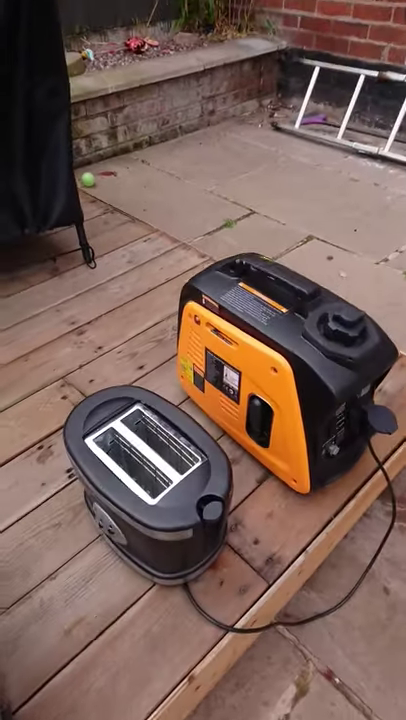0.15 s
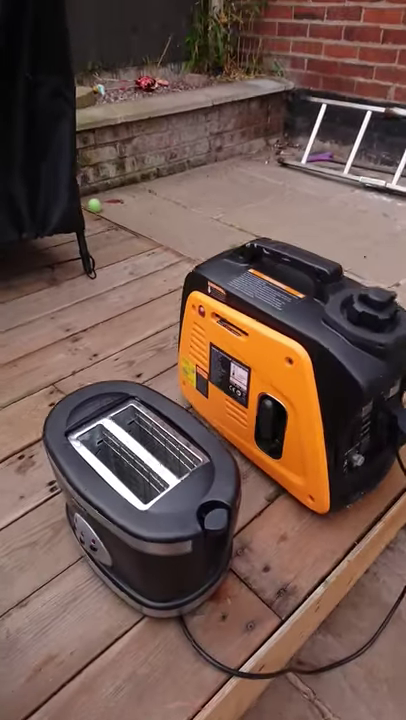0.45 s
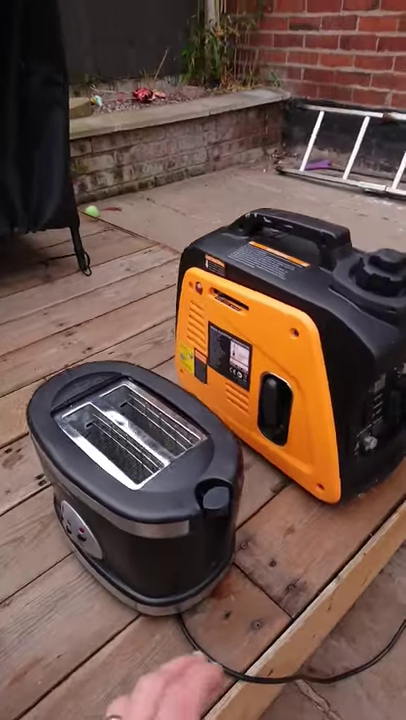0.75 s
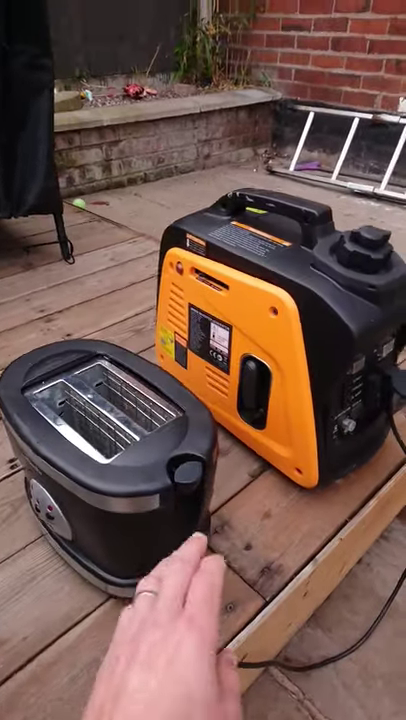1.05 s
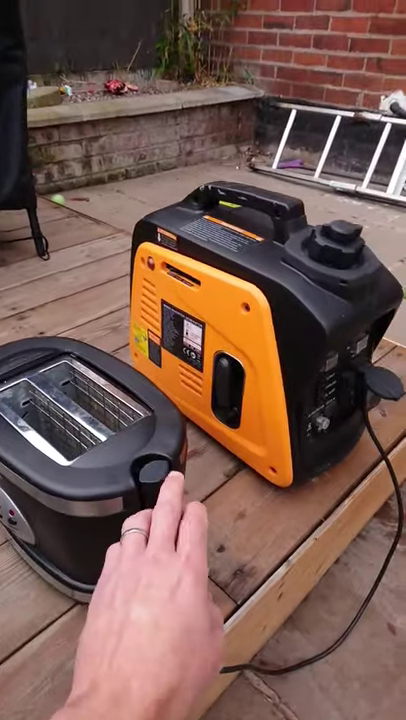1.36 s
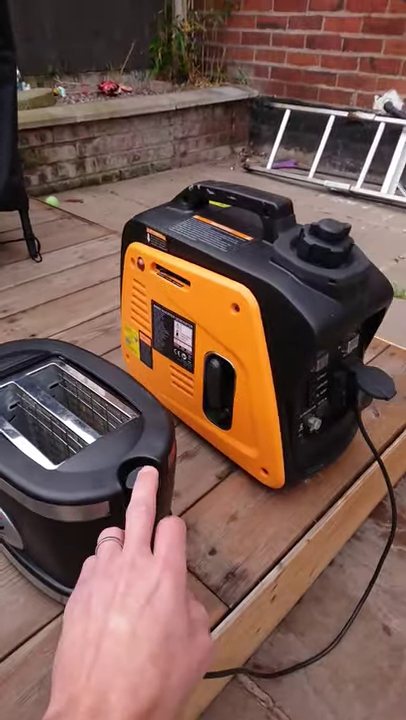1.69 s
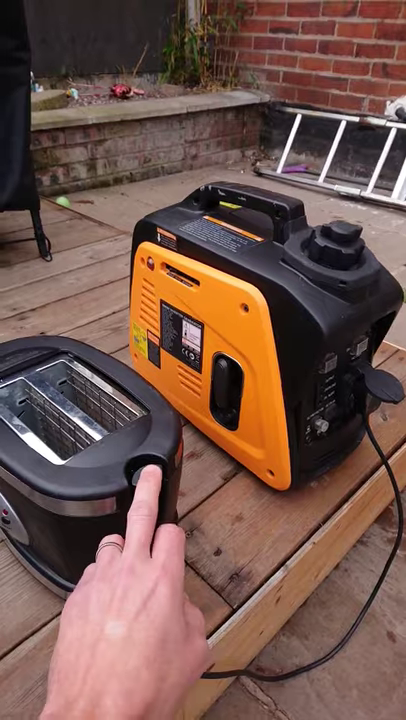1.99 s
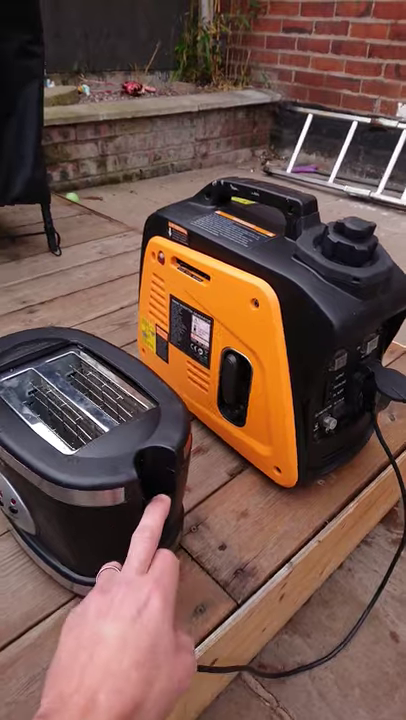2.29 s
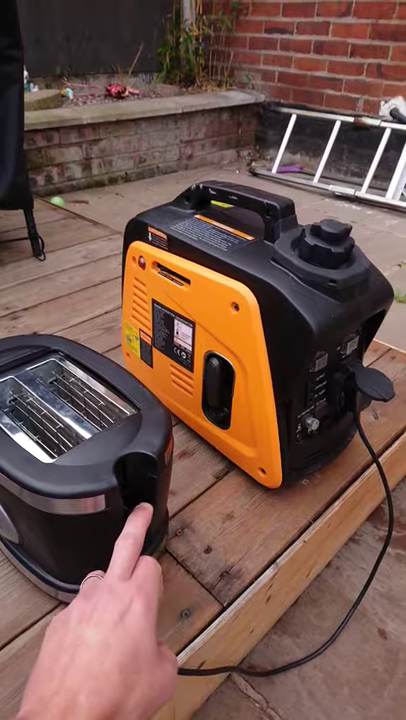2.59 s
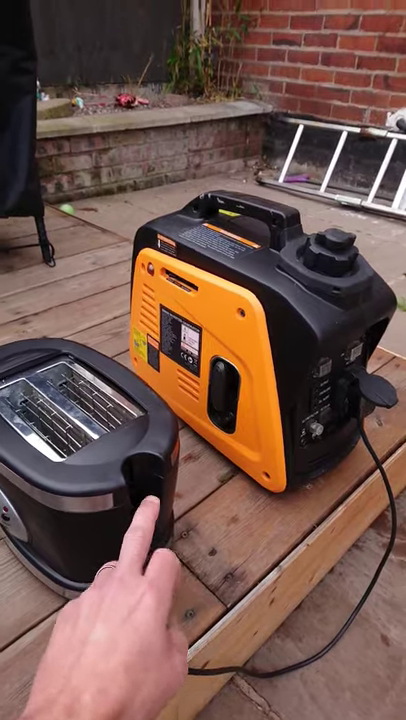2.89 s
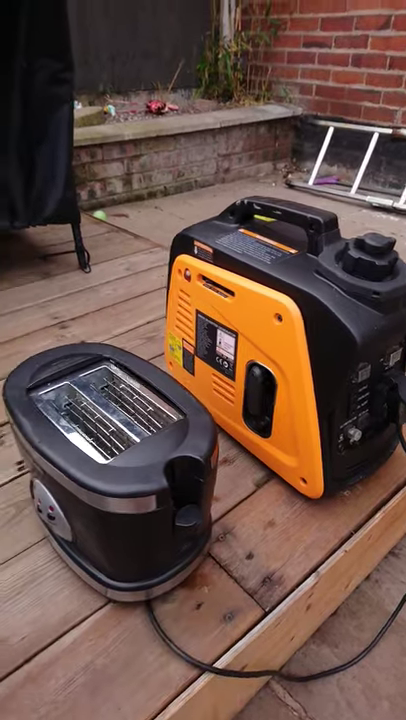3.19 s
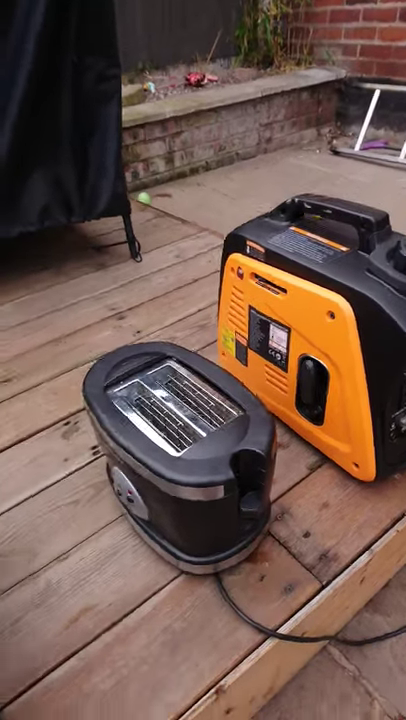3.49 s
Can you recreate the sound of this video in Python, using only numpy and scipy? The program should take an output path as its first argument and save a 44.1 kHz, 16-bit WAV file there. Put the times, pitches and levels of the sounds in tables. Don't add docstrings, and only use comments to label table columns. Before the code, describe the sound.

A small petrol generator drones outdoors, then sags under load and revs up louder.

```python
import sys
import numpy as np
from scipy import signal
from scipy.fft import rfft, irfft, next_fast_len
from scipy.io import wavfile
from scipy.ndimage import uniform_filter1d

SR = 44100
rng = np.random.default_rng(int(sys.argv[2]) if len(sys.argv) > 2 else 0)


def undo_db(level):
    steps = np.asarray(level, float) / 20
    return 10 ** steps


def pcm_store(signal):
    levels = np.round(np.clip(np.atleast_2d(signal), -1, 1) * 32767)
    wavfile.write(sys.argv[1], SR, levels.astype(np.int16).T)


N = 160965


def read(table, hz):
    table = np.array(table, float)
    return np.interp(np.log(np.maximum(hz, 1)), np.log(table[:, 0]), table[:, 1])


def unit(x):
    return x / np.sqrt(np.mean(x ** 2))


def walk(rate_hz):
    hold = int(SR / rate_hz)
    steps = np.repeat(rng.standard_normal(N // hold + 1), hold)
    return unit(uniform_filter1d(uniform_filter1d(steps, hold), hold)[:N])


# (multiple of the firing rate, level [dB])
FAR_IDLE = [(1, -35), (2, 0), (3, -3), (4, -8.5), (5, -2), (6, -2), (7, -6.5), (8, -30), (9, -7),
            (10, -9.5), (11, -18), (12, -23), (13, -18), (14, -35), (15, -30), (16, -27), (17, -21),
            (18, -23), (19, -26), (20, -34), (21, -32), (22, -29), (23, -27), (24, -36)]
IDLE = [(1, -42), (2, 0.5), (3, -4), (4, -8.5), (5, -4), (6, -4.5), (7, -7), (8, -17), (9, -4), (10, -10),
        (11, -17), (12, -19.5), (13, -18), (14, -35), (15, -26.5), (16, -31), (17, -24.5), (18, -30),
        (19, -28.5), (20, -31.5), (21, -29.5), (22, -21), (23, -37.5), (24, -16.5)]
LUGGING = [(1, -42), (2, 0), (3, -3), (4, -5.5), (5, -7), (6, -3), (7, -17), (8, -13), (9, -2.5), (10, -21),
           (11, -16), (12, -28), (13, -17.5), (14, -27), (15, -29), (16, -28), (17, -11.5), (18, -28),
           (19, -22), (20, -22), (21, -35), (22, -21), (23, -31), (24, -25)]
CATCHING = [(1, -33), (2, 0), (3, -5), (4, -3.5), (5, -13), (6, -2.5), (7, -21), (8, -12), (9, -7.5),
            (10, -16), (11, -23), (12, -14), (13, -15), (14, -29), (15, -23), (16, -23), (17, -10.5),
            (18, -30), (19, -17.5), (20, -20), (21, -37), (22, -20), (23, -24), (24, -23)]
PULLING = [(1, -34), (2, 1), (3, -5.5), (4, -7), (5, -25), (6, -6), (7, -22), (8, -12.5), (9, -5.5),
           (10, -10.5), (11, -18.5), (12, -20), (13, -16.5), (14, -15), (15, -40), (16, -19), (17, -11),
           (18, -24), (19, -24), (20, -17), (21, -18), (22, -30), (23, -18), (24, -34)]
REVVED = [(1, -27), (2, 0.5), (3, -6), (4, -9), (5, -24), (6, -3), (7, -9), (8, -13.5), (9, -9.5),
          (10, -12), (11, -22.5), (12, -16.5), (13, -24.5), (14, -26), (15, -15), (16, -16), (17, -17.5),
          (18, -16.5), (19, -25), (20, -18.5), (21, -31), (22, -34), (23, -35), (24, -25)]
LUG_HZ, CATCH_HZ, PULL_HZ, REV_HZ = 33.4, 34.44, 35.67, 37.88
IDLE_PULSE, PULL_PULSE, REV_PULSE = (.365, .005, -.07), (.353, -.016, -.1), (.78, .023, .11)
PULSE_ORDER = 4
SILENCER_ORDER, TRAIL_TURNS = 12, .04
WOBBLE_DB, WOBBLE_PER_ORDER_DB, DRIFT_PER_ORDER_RAD = 0.64, .03, .011
LOAD_STEADIES = .7


def exhaust(turn, hz, load, far):
    orders = np.arange(1, len(IDLE) + 1)
    states = []
    for table, (at, ahead, lead) in ((FAR_IDLE, IDLE_PULSE), (IDLE, IDLE_PULSE), (LUGGING, PULL_PULSE),
                                     (CATCHING, PULL_PULSE), (PULLING, PULL_PULSE), (REVVED, REV_PULSE)):
        db = np.array(table, float)[:, 1]
        turns = orders * at - ahead * (orders - PULSE_ORDER) ** 2 + lead * (-1) ** orders
        if table is REVVED:
            turns = turns + TRAIL_TURNS * np.maximum(orders - SILENCER_ORDER, 0) ** 2
        rad = np.pi - 2 * np.pi * turns
        states.append(undo_db(db) * np.exp(1j * rad * (orders != 2)))
    states = np.array(states)

    place = np.interp(hz, [LUG_HZ, CATCH_HZ, PULL_HZ, REV_HZ], [1, 2, 3, 4])
    loaded = [load * np.clip(1 - abs(place - k), 0, 1) for k in range(1, 5)]
    share = np.array([far, 1 - load - far] + loaded)

    out, loose = np.zeros((2, N)), 1 - LOAD_STEADIES * load
    for k, mix in zip(orders, states.T):
        wobble_db = (WOBBLE_DB + WOBBLE_PER_ORDER_DB * k) * walk(10.01)
        drift_rad = DRIFT_PER_ORDER_RAD * k * walk(14)
        level = (abs(mix) @ share) * undo_db(loose * wobble_db)
        phase = 2 * np.pi * k * turn + np.angle(mix @ share) + loose * drift_rad
        apart = k * (0.0082 * walk(7.19) + .015j * walk(4.84))
        out += (level * np.exp(1j * phase) * np.exp([apart, -apart])).real
    return out / np.sqrt(np.sum(abs(states) ** 2, axis=1) @ share / 2)


# (turn of the cycle, rise [turns], fall [turns], level [dB], lift under load [dB])
PUFFS = [
    (.36, .075, .15, 4, 0),
    (.83, .06, .1, -5, -8),
    (.09, .06, .08, -14, 5),
]
PUFF_SCATTER_DB, BAND_SCATTER_DB = 1.2, 1.6
LOAD_SHORTENS = 0.23


def puffs(turn, load, common):
    out = 0
    for (at, rise, fall, db, load_db), both in zip(PUFFS, common):
        since = turn - at + 1
        alone = rng.standard_normal(len(both))
        scatter_db = PUFF_SCATTER_DB * np.tanh(both) + BAND_SCATTER_DB * np.tanh(alone)
        size = undo_db(load_db * load) * undo_db(db + scatter_db)[since.astype(int)]
        p = since % 1
        out = out + size * (1 - np.exp(-(p / rise) ** 2)) * np.exp(-p / fall / (1 - LOAD_SHORTENS * load))
    return unit(out)


# (frequency [Hz], likeness [0-1])
ALIKE = [(100, 1), (600, 1), (1400, 0.28), (3000, 0.19), (15000, 0)]


def pair_noise():
    hz = np.arange(N // 2 + 1) * SR / N
    alike = np.clip(read(ALIKE, hz), 0, 1)
    mid, side = rfft(rng.standard_normal((2, N)))
    return hz, np.sqrt((1 + alike) / 2) * mid + np.sqrt((1 - alike) / 2) * side * np.array([[1], [-1]])


# (frequency [Hz], density [dB per Hz])
RATTLE = [(30, 1), (250, 5), (600, 2.5), (1000, 0), (1300, 0.5), (2000, -3), (4500, -4), (16000, -10)]
# (frequency [Hz], width [Hz], lift [dB])
CASING = [(1240, 77, 1.5), (1600, 200, 2), (2450, 530, 1), (2960, 360, 2.5), (4200, 167, 0.5),
          (11300, 280, 4.5)]
# (frequency [Hz], share [0-1])
GATED = [(200, .3), (1000, .2), (3000, .3), (6000, .5), (10000, .88), (11500, .7), (13500, .5)]
LOAD_GATES, FLICKER_DB = .1, 1
LOAD_MID_DB, LOAD_TREBLE_DB = -2, 9.5


def rattle(turn, load):
    hz, noise = pair_noise()
    panels_db = sum(db * np.exp(-((hz - f) / w) ** 2) for f, w, db in CASING)
    noise = noise * undo_db(read(RATTLE, hz) + panels_db)
    scale = np.std(irfft(noise * (hz > 1500) * (hz < 6000), N))
    load_lift = [(300, 3.16), (1200, LOAD_MID_DB), (2200, 0.56), (6000, 3.6), (9000, LOAD_TREBLE_DB)]
    out, common = 0, rng.standard_normal((len(PUFFS), 256))
    for centre in 30 * 2 ** np.arange(0, 9.6, .5):
        octaves = np.log2(np.maximum(hz, 1) / centre)
        band = irfft(noise * np.cos(np.pi * np.clip(octaves, -.5, .5)) ** 2, N)
        gated = np.clip(read(GATED, centre) + LOAD_GATES * load, 0, 1)
        pulsing = np.sqrt(1 - gated + gated * puffs(turn, load, common) ** 2)
        out = out + band * pulsing * undo_db(load * read(load_lift, centre) + FLICKER_DB * walk(14))
    return out / scale


# (turn of the cycle, level [dB], lift under load [dB])
KNOCKS = [(.49, 5.5, -5), (.6, 2, -4.5), (0.751, 4, -6), (0.991, 2.5, -13), (.1, -7.5, 16), (.27, -10, 12)]
# (frequency [Hz], time to fall 60 dB [s], level [dB], left minus right [dB], lift while far [dB])
KNOCK_MODES = [(588, 0.02, -0.5, 4.5, 2), (910, 0.011, -23.5, 2, -3), (1164, 0.023, -6, 8.5, 1),
               (1319, 0.022, -3.5, 1, 2), (1554, 0.014, -6, 4.5, -2), (1767, 0.013, -9, 2, -4),
               (2276, 0.017, -6.5, 5.5, -8), (4550, 0.017, -7.5, 4.5, 6)]
KNOCK_JITTER_S, KNOCK_SCATTER_DB, KNOCK_PUSH_SAMPLES = .00004, 1., 12
KNOCK_DB, KNOCK_LOAD_DB = -9, 4.5


def knocks(turn, load, far):
    hits, cycles = np.zeros(N), np.arange(int(turn[-1]) + 1)
    for at, db, load_db in KNOCKS:
        late, scatter = rng.standard_normal((256, 2))[cycles].T
        where = np.interp(cycles + at, turn, np.arange(N)) + KNOCK_JITTER_S * SR * late
        where = np.clip(where, 0, N - 2)
        first = where.astype(int)
        size = undo_db(db + load_db * load[first] + KNOCK_SCATTER_DB * scatter)
        np.add.at(hits, first, size * (1 - where % 1))
        np.add.at(hits, first + 1, size * (where % 1))
    hits, out = uniform_filter1d(hits, size=KNOCK_PUSH_SAMPLES), 0
    for hz, t60, db, pan_db, far_db in KNOCK_MODES:
        pole = np.exp((2j * np.pi * hz - np.log(1000) / t60) / SR)
        ring = signal.lfilter([1], [1, -pole], hits).imag
        out = out + unit(ring) * undo_db(db + far_db * far + np.array([[pan_db], [-pan_db]]) / 2)
    return out * undo_db(KNOCK_DB + KNOCK_LOAD_DB * load)


# (time [s], peak level [dB])
SLAPS = [(2.0199, -11), (2.2245, -17), (2.4917, -16), (2.584, -21), (2.6434, -22), (2.7305, -23),
         (2.9027, -21), (3.0717, -2.5), (3.1008, -6.5), (3.1533, -15), (3.2093, -22), (3.2895, -17),
         (3.3444, -6), (3.4222, -19), (3.528, -28)]
SLAP_DB, SLAP_RISE_S, SLAP_FALL_S = -17, .0015, 0.00099


def slaps(t):
    hz, noise = pair_noise()
    crack = unit(irfft(noise * np.clip(hz / 9000, 0, 1) ** 2, N))
    env = 0
    for start, db in SLAPS:
        rise = np.clip((t - start) / SLAP_RISE_S, 0, 1)
        env = env + undo_db(db + SLAP_DB) * rise * np.exp(-np.clip(t - start, 0, None) / SLAP_FALL_S)
    return crack * env


# (time [s], length [s], level [dB])
LEVER = [
    (2.289, 0.016, -32.5),
    (2.337, 0.052, -39),
    (2.387, 0.061, -42),
]
LATCH_HZ, LATCH_T60_S, LATCH_DB = 6700, 0.04, -37


def toaster(t):
    hz, noise = pair_noise()
    colour = [(2000, -17), (6000, -16), (11000, -3.5), (15000, -4)]
    rub = unit(irfft(noise * undo_db(read(colour, hz)), N))
    env = 0
    for start, length, db in LEVER:
        rise = np.clip((t - start) / 0.0043, 0, 1)
        env = env + undo_db(db) * rise * np.exp(-np.clip(t - start - length, 0, None) / 0.02)
    since = np.clip(t - LEVER[0][0], 0, None)
    ping = undo_db(LATCH_DB - 60 * since / LATCH_T60_S) * np.sin(2 * np.pi * LATCH_HZ * since)
    return rub * env * undo_db(1.3 * walk(200)) + ping


# (time [s], firing rate [Hz], exhaust level [dB], rattle level [dB])
ENGINE = [(0.0, 35.08, -35, -45.5), (0.08, 34.9, -33.5, -46.5), (0.53, 34.33, -31.5, -45.5),
          (1.24, 33.93, -31, -45.5), (1.55, 34.51, -30, -45.5), (1.88, 34.52, -30.5, -45),
          (2.16, 34.14, -31, -45.5), (2.35, 34.46, -30.5, -45), (2.39, 33.93, -31, -43.5),
          (2.451, 32.57, -27, -45), (2.5, 32.53, -23, -41.5), (2.58, 33.33, -23, -41.5),
          (2.742, 34.67, -23, -40), (3.08, 36.12, -20.5, -40), (3.4, 38.13, -21.5, -39.5),
          (3.6, 39, -20, -40), (3.65, 39.66, -22, -40)]
START_TURN, RATE_TRIM = .125, .9976
LOAD_S, LOAD_RISE_S = 2.46, .04
ARRIVES_S, APPROACH_S = 0.97, 0.31


def scene():
    t = np.arange(N) / SR
    s, *curves = np.array(ENGINE, float).T
    hz, exhaust_db, rattle_db = (np.interp(t, s, c) for c in curves)
    turn = START_TURN + RATE_TRIM * np.cumsum(hz) / SR
    load = np.clip((t - LOAD_S) / LOAD_RISE_S + .5, 0, 1)
    far = np.clip((ARRIVES_S - t) / APPROACH_S, 0, 1)
    engine = undo_db(exhaust_db) * exhaust(turn, hz, load, far)
    clatter = undo_db(rattle_db) * (rattle(turn, load) + knocks(turn, load, far))
    return engine + clatter + slaps(t) + toaster(t)


def roll_off(x):
    return signal.sosfilt(signal.butter(12, 15840, fs=SR, output="sos"), x)


# (frequency [Hz], level [dB])
LEFT_PORT = [(4800, 0.5), (6600, -6.5), (7600, -21.5), (8900, -12), (9400, 5.5), (9900, 12), (11300, 2.5),
             (15500, -3)]
RIGHT_PORT = [(5300, 1.5), (6600, -10), (7500, -23.5), (8300, -11), (9000, -20), (9900, -8), (10900, -24),
              (13000, 3), (15500, -8)]
# (frequency [Hz], left minus right [dB])
LEAN = [(60, 3), (200, 3.5), (380, 6.5), (800, 0.5), (2400, 7), (4400, 2.5)]
RIGHT_LATE_S, TOP_HZ = .00015, 15600


def record(dry):
    size = next_fast_len(N + 4096)
    hz = np.arange(size // 2 + 1) * SR / size
    lean = read(LEAN, hz) / 2
    ports_db = np.array([read(LEFT_PORT, hz) + lean, read(RIGHT_PORT, hz) - lean])
    ports = undo_db(ports_db) * (hz < TOP_HZ) + 0j
    ports[1] *= np.exp(-2j * np.pi * hz * RIGHT_LATE_S)
    heard = irfft(rfft(dry, size) * ports, size)[:, :N]
    return roll_off(heard)


dry = scene()
out = record(dry)
pcm_store(out)
```